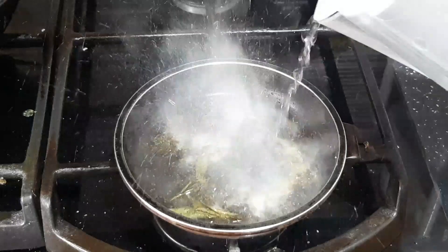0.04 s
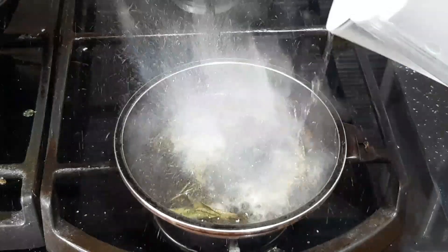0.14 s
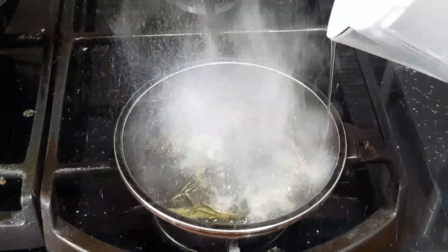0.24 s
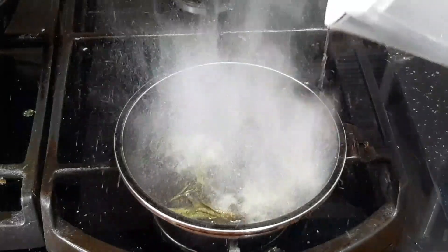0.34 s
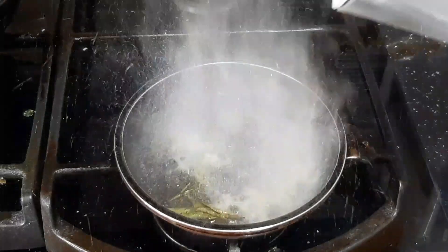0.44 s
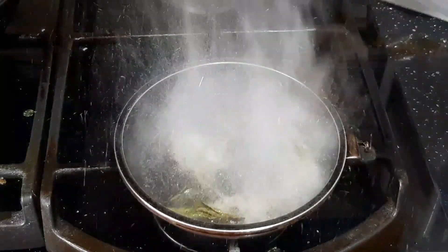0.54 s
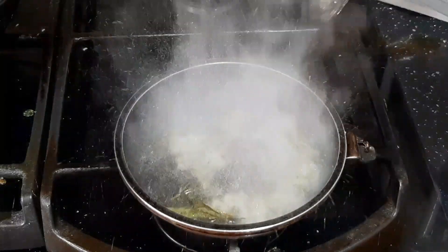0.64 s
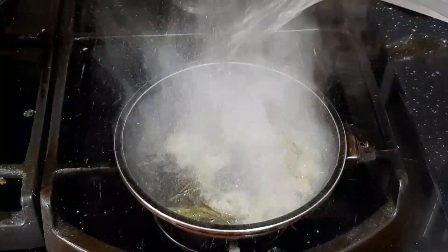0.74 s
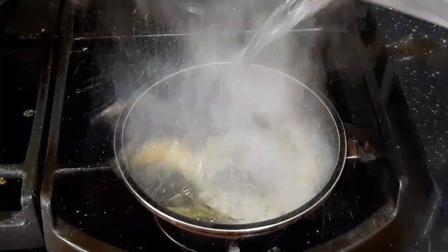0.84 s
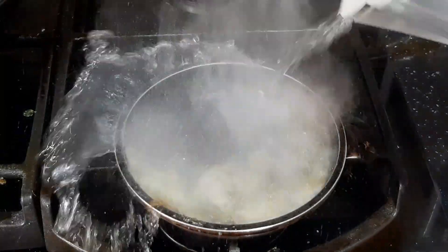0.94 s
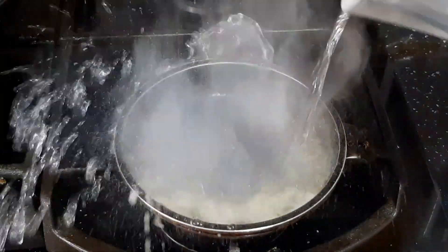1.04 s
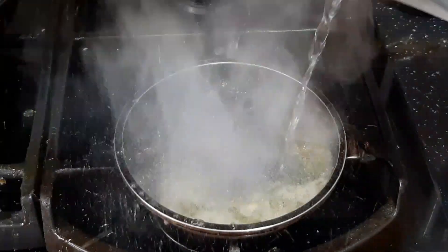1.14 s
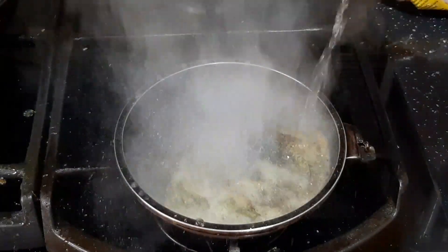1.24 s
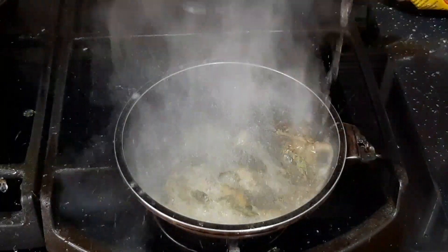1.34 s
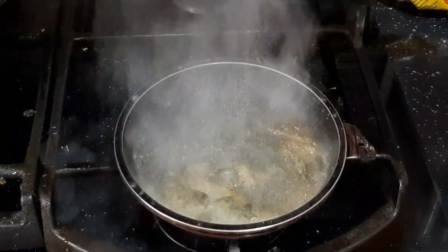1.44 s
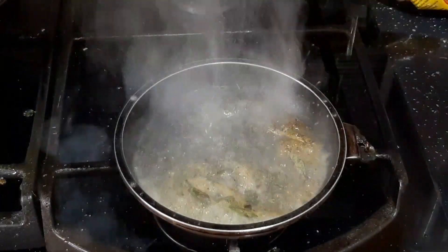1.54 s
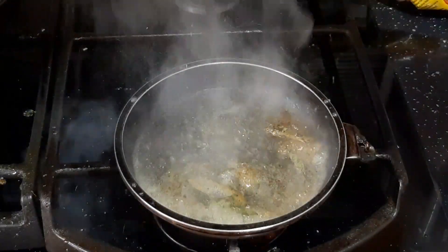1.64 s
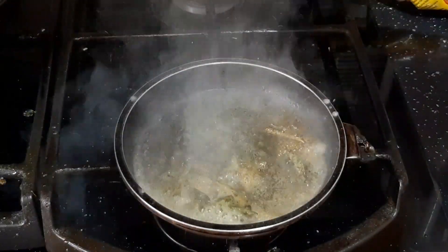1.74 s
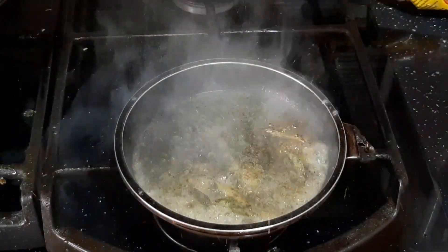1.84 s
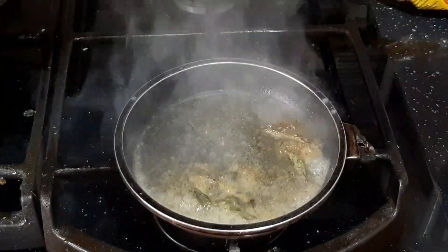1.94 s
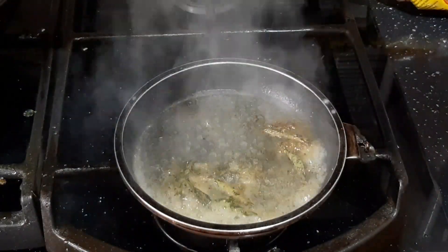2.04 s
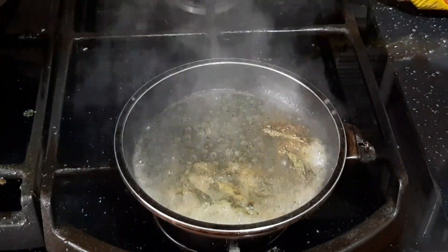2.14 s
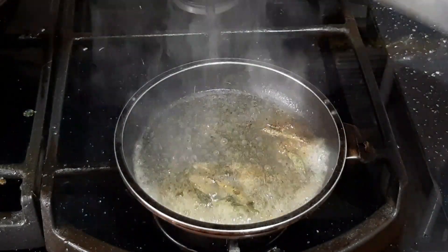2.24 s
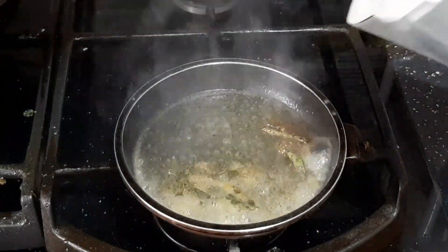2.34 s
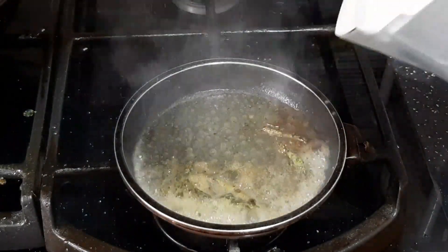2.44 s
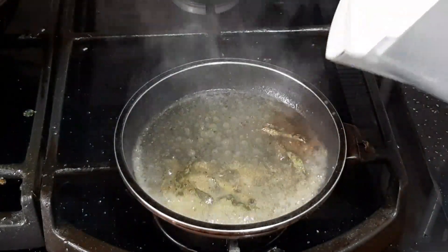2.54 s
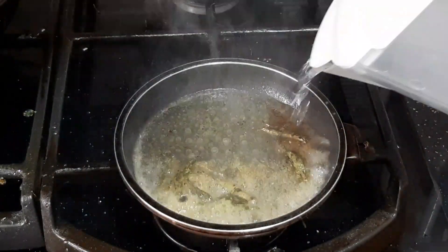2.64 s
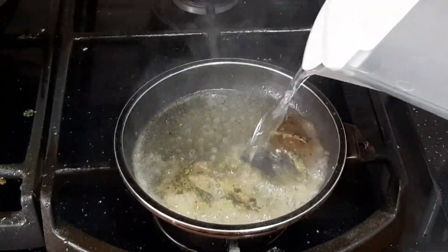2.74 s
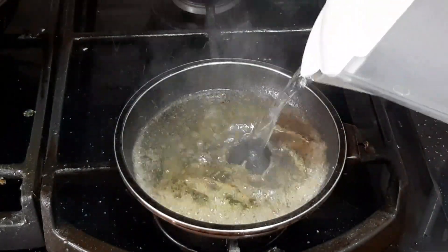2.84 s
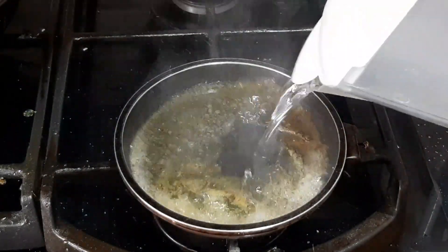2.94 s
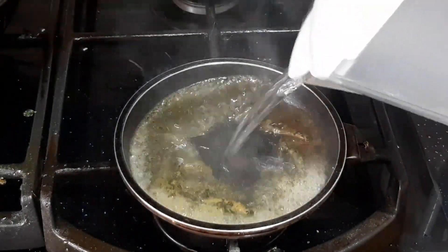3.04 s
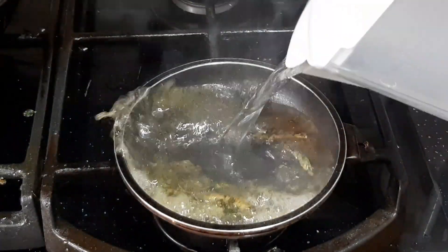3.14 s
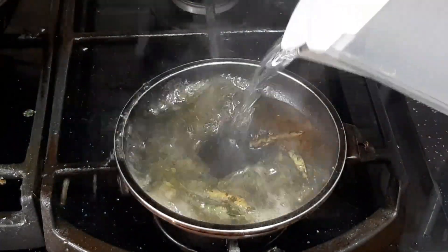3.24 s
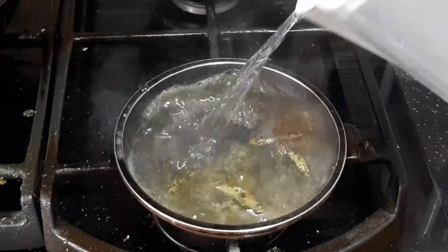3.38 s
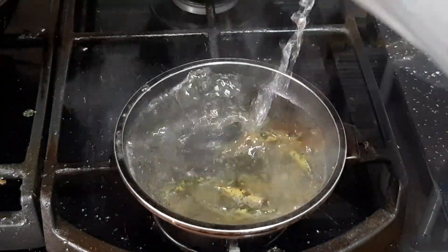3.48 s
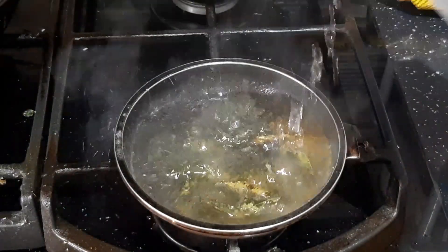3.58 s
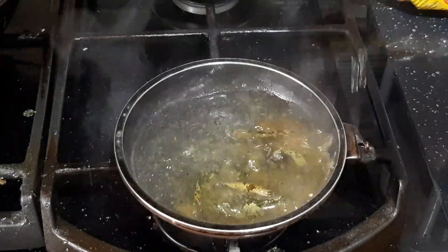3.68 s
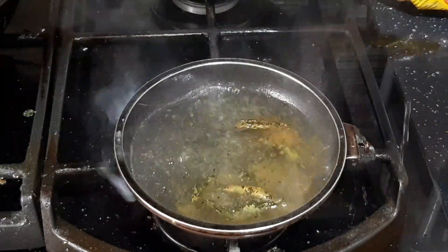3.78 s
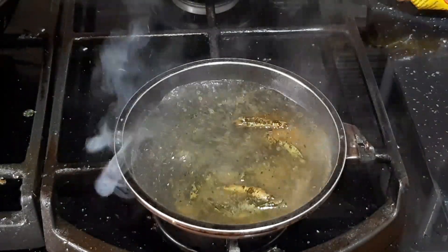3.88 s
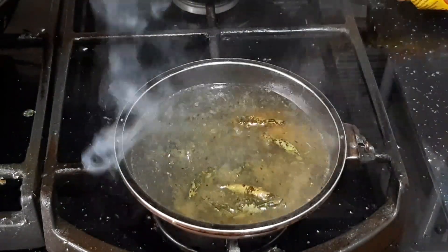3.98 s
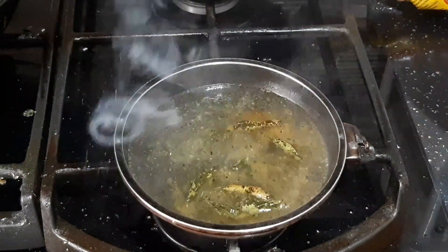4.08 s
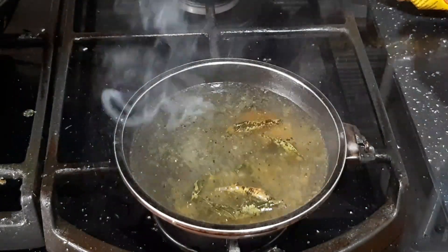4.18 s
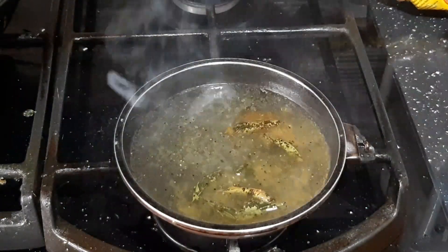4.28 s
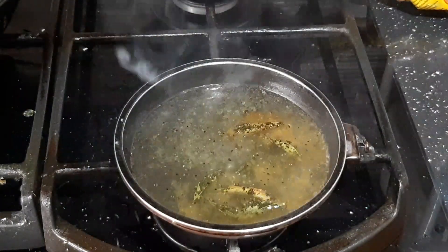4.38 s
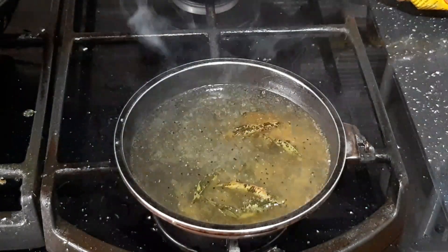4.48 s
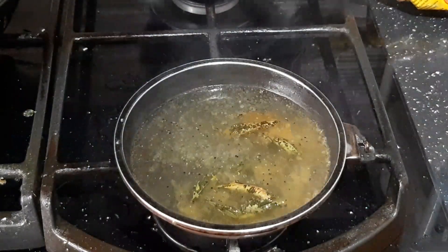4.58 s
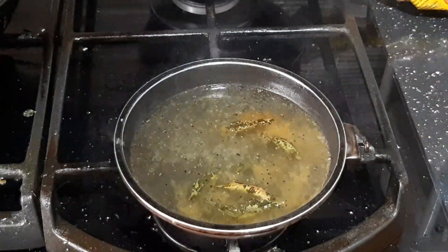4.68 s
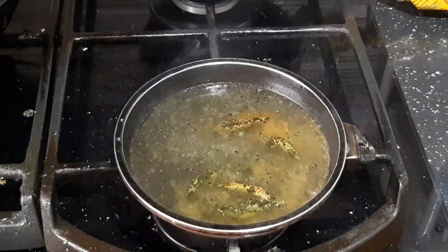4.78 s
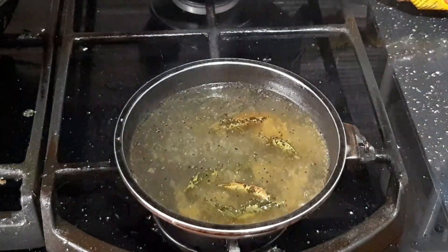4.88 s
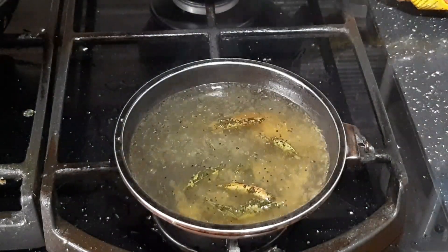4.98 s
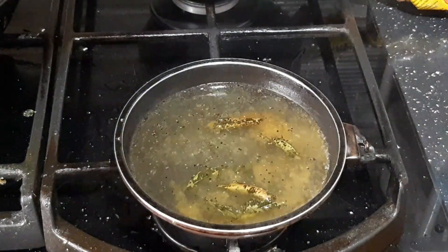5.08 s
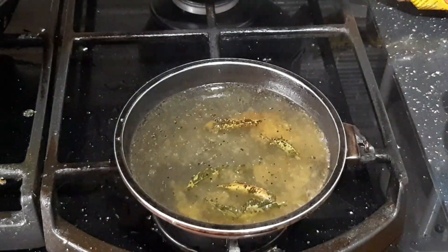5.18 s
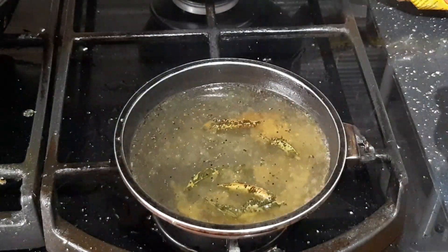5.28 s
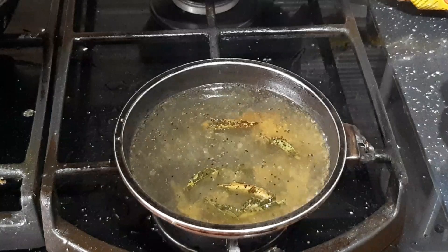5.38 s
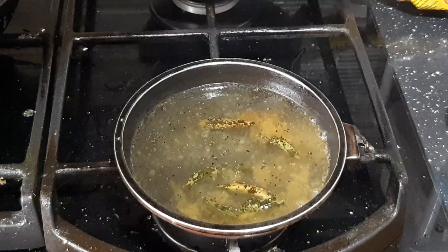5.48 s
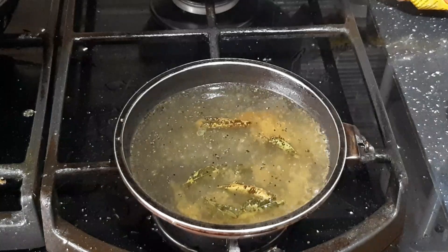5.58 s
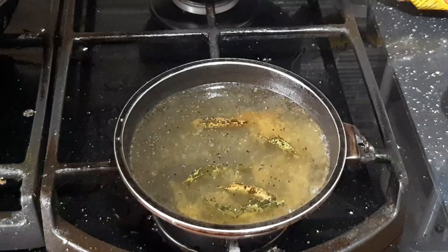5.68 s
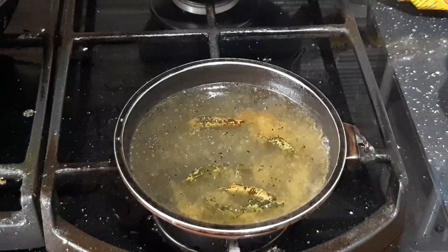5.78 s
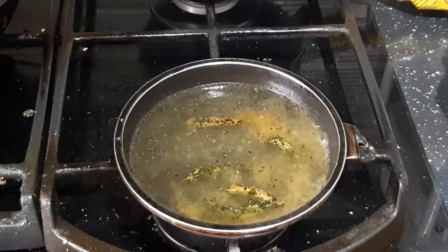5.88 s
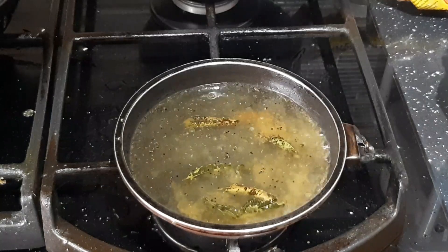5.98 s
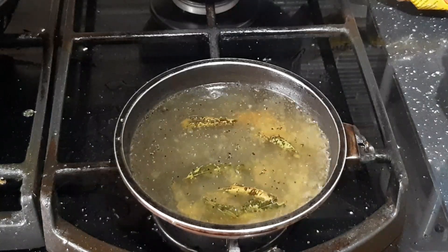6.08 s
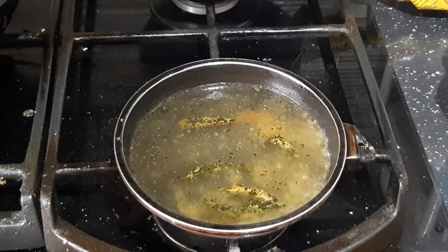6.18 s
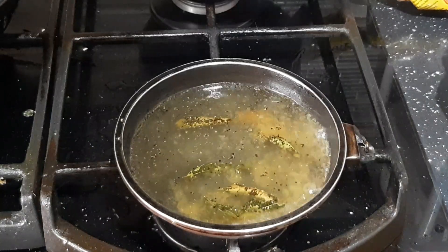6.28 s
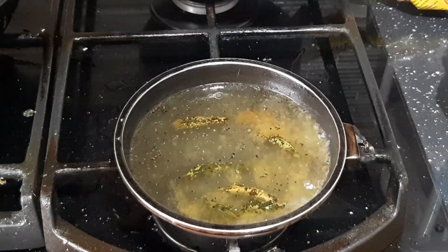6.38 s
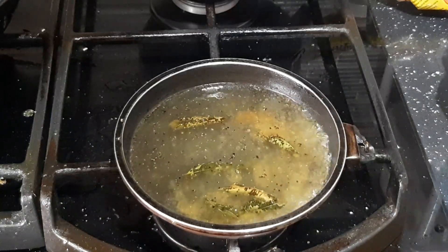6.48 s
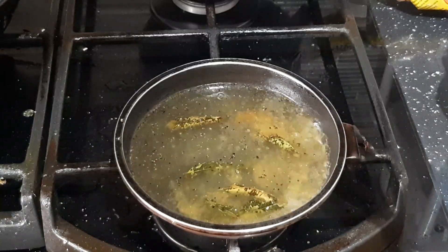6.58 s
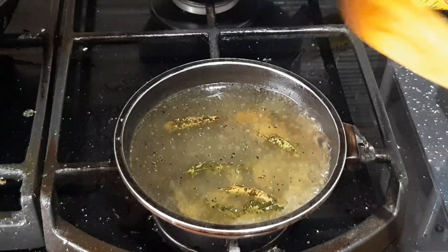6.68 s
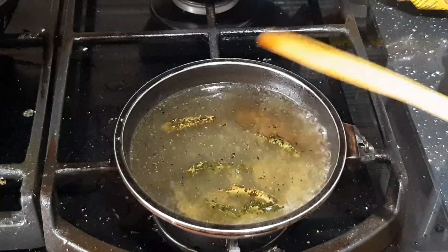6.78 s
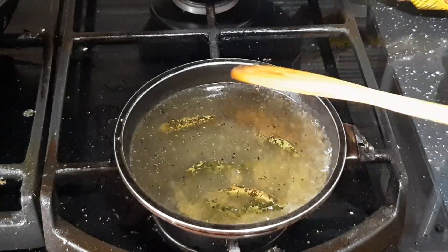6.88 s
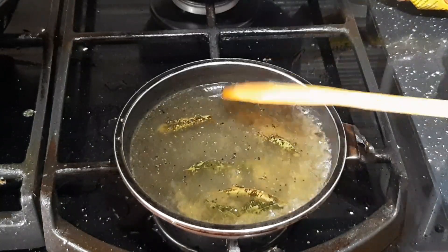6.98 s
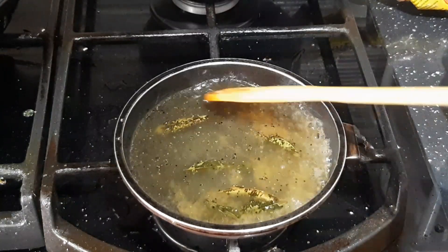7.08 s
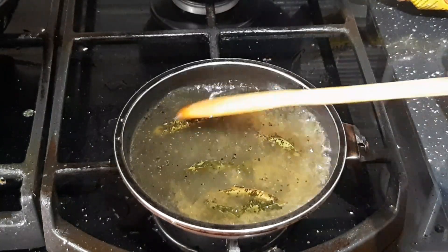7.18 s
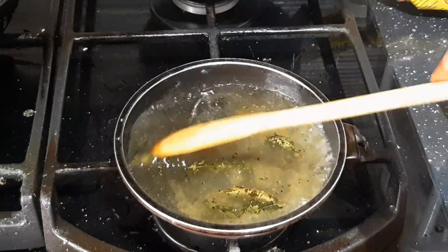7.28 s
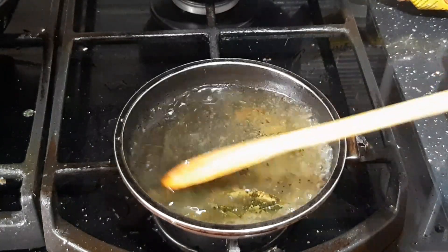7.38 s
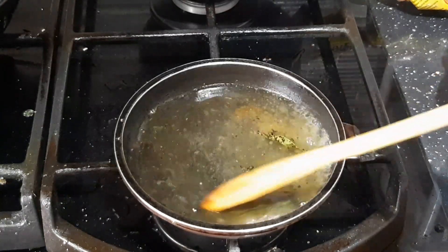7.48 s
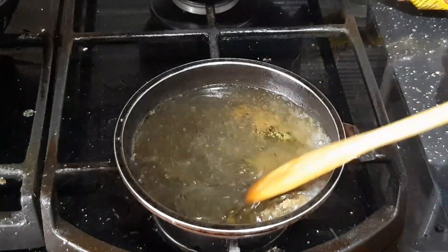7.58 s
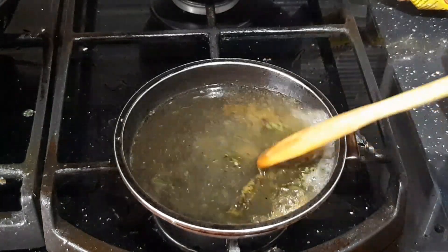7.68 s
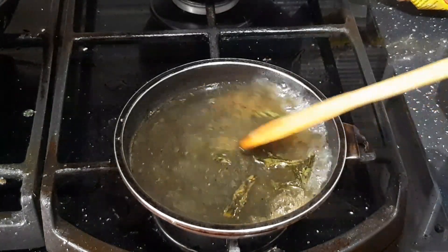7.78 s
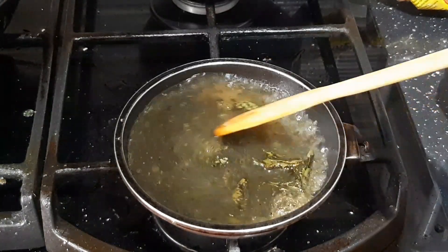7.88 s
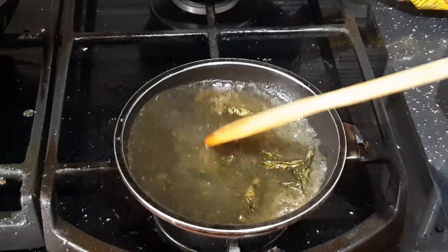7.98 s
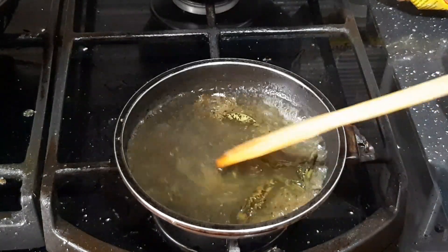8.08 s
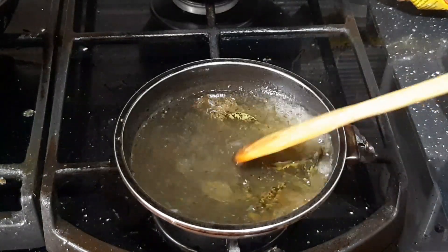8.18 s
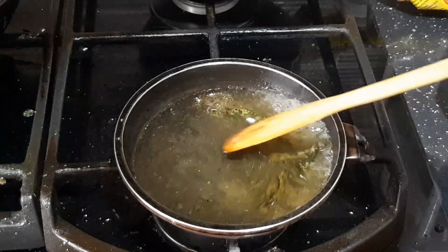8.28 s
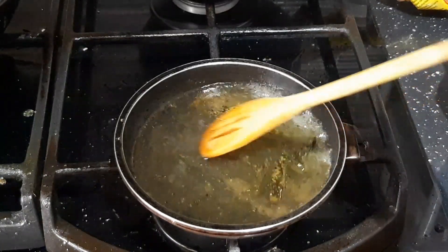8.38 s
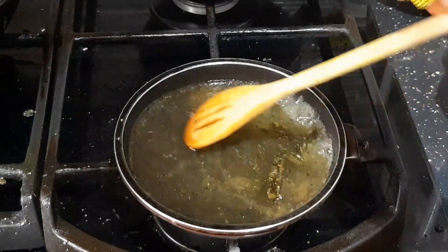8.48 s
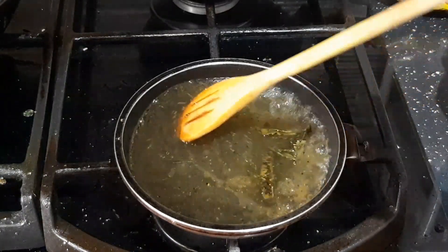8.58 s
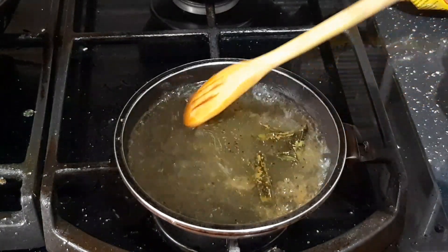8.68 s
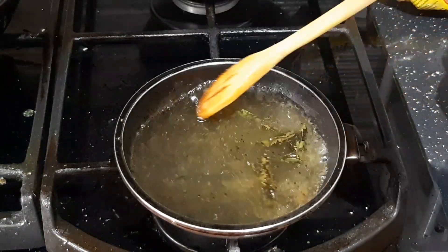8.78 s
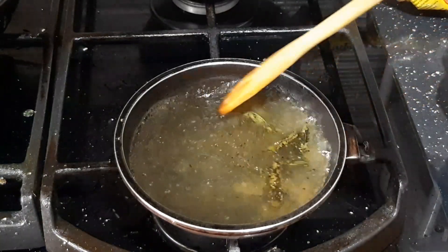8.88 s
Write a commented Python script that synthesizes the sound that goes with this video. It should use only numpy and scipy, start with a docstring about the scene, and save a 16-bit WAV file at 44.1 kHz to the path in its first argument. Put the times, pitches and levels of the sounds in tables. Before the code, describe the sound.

From the start, water flashes to steam in hot oil: a loud, bright, roaring hiss with dense crackle, and fine spray pattering on the left of a very close microphone, the right being softer and duller. The roar surges again around 0.9-1.0 s, then thins from 1.5 s into frying with sparse sharp ticks and blunt thumps of larger drops, heaviest at 1.4-1.6 s. Stronger pops crack at 2.5 and 2.9 s. Around 3.4 s the spray stops abruptly as more water goes in, leaving much quieter frying. From 4.3 s bubbling and spitting pick up, with many pops and a watery murmur, swelling near 4.8 s. A jug knocks and grates on the counter at 5.4-5.7 s, with a loud pop at 5.7 s. It calms around 6 s. From 7 s a wooden spoon plunges in, rasping and sloshing, pressing harder at 8.1 s amid pops and livelier sizzling. A faint burner and room rush lies beneath.

```python
"""Water meets hot oil and spices in a small pan on a gas hob: steam roars and fries, and a cloud of spray
peppers the left microphone port with hiss and clicks. At 3.4 s the spray stops as a second pour drowns
the oil; bursting bubbles and steam pockets keep the pan frying and spitting over murmuring water.
From 5.4 s the jug knocks and grates on the counter, ringing its modes. From 7 s a wooden spoon stirs:
clumped slips rasp in the pan's resonances and water sloshes round it. Burner and room rush throughout."""
import sys
import numpy as np
from scipy import signal
from scipy.fft import rfft, irfft
from scipy.io import wavfile

SR = 44100
rng = np.random.default_rng(int(sys.argv[2]) if len(sys.argv) > 2 else 0)


def persist_wave(psi):
    """Save psi, clipped to +-1, as 16-bit WAV."""
    counts = np.round(np.clip(psi, -1, 1) * 32767).astype(np.int16)
    wavfile.write(sys.argv[1], SR, np.atleast_2d(counts).T)


N = 393813
TIME = np.arange(N) / SR

# Rush of burner and room. Each row: frequency in Hz, relative density in dB per Hz.
ROOM_COLOUR = [(25, -31), (60, -5), (130, 4.5), (350, 4), (700, -0.5), (2000, -4), (8000, -14.5)]
# Water murmuring as it heats. Each row: time in seconds, relative level in dB.
MURMUR_LEVEL = [(3.0, -80.5), (3.6, -61), (4.3, -71.5), (4.8, -49.5), (5.3, -52), (6.3, -59), (7.0, -64.5),
                (7.6, -64)]
# Resonances of the still water in the pan. Each row: frequency in Hz, width in Hz, relative height in dB.
STILL_PAN_RESONANCES = [(950, 110, 0), (1220, 220, -2)]
# Jug touching the counter. Each row: start in seconds, relative peak in dB, loss per rebound in dB.
JUG_KNOCKS = [(5.369, -10, 10.5), (5.462, -13.5, 15), (5.512, -18.5, 11), (5.534, -17.5, 9.5),
              (5.684, -24.5, 1)]
# Modes of the counter. Each row: frequency in Hz, relative level in dB, 60 dB decay time in seconds.
COUNTER_MODES = [(149, -15.5, 0.38), (243.4, -6, 0.15), (275, -2.5, 0.049), (334, -1.5, 0.065),
                 (370, -3.5, 0.1), (461, -19.5, 0.29), (636, -24, 0.11), (835, -12, 0.02)]
# Base of the jug grating on the counter. Each row: frequency in Hz, relative density in dB per Hz.
GRATE_COLOUR = [(200, -15), (500, 4), (1200, 3.5), (1800, -0.5), (3200, -1), (5000, -18), (9000, -47)]
# Resonances of the stirred pan. Each row: frequency in Hz, width in Hz, relative height in dB.
STIRRED_PAN_RESONANCES = [(446, 16, 9.5), (705, 33, 2), (1350, 52, 4), (1900, 27, -2), (2090, 410, 8),
                          (2610, 700, 7.5), (4080, 570, 2.5)]
# Water sloshing round the spoon. Each row: frequency in Hz, relative density in dB per Hz.
SLOSH_COLOUR = [(30, -34), (70, -11), (160, -7.5), (260, 1), (450, -3.5), (700, -16), (1500, -28)]
# First water flashing to steam. Each row: time in seconds, relative level in dB.
FLASH_LEVEL = [(0, -34), (.2, -33), (.4, -41), (.55, -37), (.75, -44), (.88, -31.5), (1.0, -31), (1.2, -44),
               (1.6, -37), (2.4, -60.5)]
# Resonances of the nearly empty pan. Each row: frequency in Hz, width in Hz, relative height in dB.
EMPTY_PAN_RESONANCES = [(1282, 70, 2.5), (1460, 430, -3.5), (2535, 130, 4.5), (3320, 490, -1),
                        (4530, 810, -2.5), (5500, 380, -13)]
# Vigour of the frying. Each row: time in seconds, relative level in dB.
FRYING_LEVEL = [(0.0, -37), (0.72, -39.5), (0.92, -39.5), (1.45, -40.5), (1.8, -45), (2.7, -49.0),
                (3.45, -44.5), (3.7, -48.5), (4.3, -46), (4.6, -41), (5.2, -45), (5.8, -48), (5.97, -53.5),
                (6.92, -51.5), (7.05, -48.5), (7.3, -51), (7.9, -42), (8.4, -51), (8.93, -46)]
# Coarse bubbles, then fine fizz. Each row: frequency in Hz, relative density in dB per Hz.
BUBBLE_COLOUR = [(60, -22), (280, -9.5), (430, -4.5), (600, -7.5), (1050, -7), (1300, -5.5), (1700, -3.5),
                 (2900, -1.5), (5200, -3), (6200, -10), (8500, -14), (15000, -41)]
FIZZ_COLOUR = [(200, -67), (3000, -17), (6000, -11.5), (8500, -15.5), (10000, -12), (12000, -3.5),
               (15500, -6.5)]
# Loudest steam pockets bursting in the oil and spitting on the hot wall.
# Each row: start in seconds, relative level in dB, boost of the treble band in dB.
LOUD_POPS = [(1.4336, -21, 9), (1.773, -26, -10), (2.5353, -15.5, 4.5), (2.871, -18, 30),
             (3.4664, -33.5, -14), (3.8762, -32.5, -1.5), (4.348, -28, 7), (4.424, -31, 6),
             (4.5009, -25, 21), (4.5975, -32, 11.5), (4.721, -26, 15), (4.7734, -24, -9), (4.957, -31, 0),
             (4.9866, -29, 17), (5.165, -19.5, 7), (5.2518, -31, 16), (5.271, -26, 13), (5.297, -38, 13),
             (5.358, -24.5, 6.5), (5.6305, -30, 24), (5.689, -28, 10), (5.7298, -15, 4.5),
             (5.8465, -29.5, 18), (5.8588, -31, 22), (5.9075, -32.5, 23), (6.1885, -36, 14),
             (6.225, -34, 5.5), (6.384, -33, 2.5), (6.631, -34.5, 4), (7.017, -33.5, 13),
             (7.5634, -22.5, 5), (7.721, -32, -0.5), (7.927, -31.5, 3), (7.9586, -30.5, -11),
             (8.0451, -23.5, 1), (8.0529, -28.5, -9), (8.154, -24, -4.5), (8.171, -29, -9),
             (8.2545, -24.5, 2), (8.527, -31, 7)]
# Cracks of the pops. Each row: frequency in Hz, relative density in dB per Hz.
POP_COLOUR = [(50, -35), (200, -6), (500, -4), (1500, 1), (3000, 9.5), (5000, 2.5), (8500, -9.5),
              (12000, 2.5), (15500, 5)]
# Fine spray hissing on the left port. Each row: time in seconds, relative level in dB.
MIST_LEVEL = [(0.0, -20.0), (0.7, -23.4), (0.92, -22), (1.45, -25), (1.7, -28.5), (2.4, -32), (2.95, -32),
              (3.15, -28), (3.38, -30)]
# Ticks of that spray. Each row: frequency in Hz, relative density in dB per Hz.
MIST_COLOUR = [(50, -31), (150, -13), (400, -13.5), (1200, -9), (2700, -8), (4500, -4.5), (5900, -6),
               (7300, -2.5), (8800, -6), (11500, 0.5), (15500, 1)]
# Largest drops on the left port. Each row: start in seconds, relative push in dB, settling scale in seconds.
LARGE_DROPS = [(0.0692, -7, 0.00034), (0.0982, -7.5, 0.00033), (0.164, -1.5, 0.0004), (0.178, -6, 0.00017),
               (0.3204, -4.5, 0.00078), (0.3382, -5.5, 0.0011), (0.5192, -4.5, 0.00042),
               (0.5908, -6.5, 0.00052), (0.6099, -4.5, 0.0003), (0.6956, -6, 0.00011),
               (0.7985, -3.5, 0.00016), (0.8955, -2.5, 0.0017), (1.2463, -5.5, 0.00016),
               (1.2918, -7.5, 0.00023), (1.4298, 0.5, 0.0038), (1.4851, -4.5, 0.00022),
               (1.5518, 0.5, 0.00082), (1.6722, -3, 0.0003), (1.7254, -1.5, 0.00011),
               (1.7495, -8.5, 0.00021), (1.8788, -7.5, 0.00022), (1.903, -1, 0.000093),
               (2.0178, -8, 0.00025), (2.0251, -11.5, 0.00025), (2.0705, -5, 0.0002),
               (2.1068, -12.5, 0.00034), (2.1655, -11, 0.00024), (2.22, -8.5, 0.00026),
               (2.2423, -14.5, 0.00025), (2.5245, -6.5, 0.00036), (2.871, -7, 0.00028),
               (3.0641, -8, 0.00016), (3.1414, -11, 0.00023), (3.2144, -14.5, 0.00035)]
# Smaller drops landing between them. Each row: time in seconds, rate in drops per second.
SMALL_DROP_RATE = [(0, 99.5), (.8, 110.5), (.95, 6), (1.15, 6), (1.5, 60), (2.4, 0)]
# Microphone body shading its right port. Each row: frequency in Hz, gain in dB.
RIGHT_SHADE = [(100, -5.5), (400, -0.5), (2000, -3), (4300, -3.5), (6300, -10), (8300, -13.5),
               (11000, -9.5), (15500, -5)]

CUTOFF_HZ = 15900
# the second pour drowns the oil: the spray level falls at this rate
DROWNED_S, DROWNING_DB_PER_S = 3.392, 1500
# coarse bubbles match the fizz setting at an even simmer and follow a share of its swing in dB
SIMMER_DB, BUBBLES_FOLLOW = -46.5, 0.69
# small pops: rate at an even simmer, setting above the frying curve
SPITS_PER_S, SPIT_DB = 22, 7
# each loud pop throws up oil and stirs a short surge of frying
SURGE_DB, SURGE_S = -20, 0.043
# a loud pop cracks again as its pocket collapses: this much later and weaker
COLLAPSE_S, COLLAPSE_LOSS_DB = 0.0085, 13.5
REBOUND_S = 0.012
# the spoon dips in, sweeps round the pan and bears down once
STIR_START_S, STIR_DB = 7.0, -52
PRESS_S, PRESS_LENGTH_S, PRESS_DB = 8.1, 0.28, 7.5
# the slosh is strongest as the spoon plunges in
SLOSH_DB, PLUNGE_DB, PLUNGE_S, PLUNGE_LENGTH_S = -60, 19.5, 7.105, 0.061


def from_db(db):
    """Decibels to gain."""
    return 10 ** (np.asarray(db) / 20)


def rms_one(x):
    """Scale to unit power."""
    return x / np.sqrt(np.mean(x ** 2) + 1e-20)


def in_time(rows):
    """Each column of a curve at every sample."""
    s, *columns = np.transpose(rows)
    return [np.interp(TIME, s, c) for c in columns]


def drift(rate):
    """Random wander through points of spread one, this many a second."""
    knots = rng.standard_normal(N // 20)
    return np.interp(TIME * rate, np.arange(len(knots)), knots)


def swell(peak_s, length_s):
    """A smooth rise to one and fall again."""
    return np.exp(-((TIME - peak_s) / length_s) ** 2)


def at_random(per_s):
    """Moments of chance events at a rate that may change."""
    return TIME[rng.random(N) < per_s / SR]


def grains(per_s, spread_db, largest):
    """Random clicks of either sign, many small and a few large; unit power overall, even as the rate moves."""
    sizes = from_db(spread_db * np.minimum(rng.exponential(1, N), largest)) / np.sqrt(per_s)
    signs = rng.choice([-1, 1], N)
    struck = rng.random(N) < per_s / SR
    return rms_one(sizes * signs * struck)


def through(x, response):
    """Pass a sound through an impulse response."""
    return signal.oaconvolve(np.atleast_2d(x), np.atleast_2d(response), axes=-1)[:, :N]


def colour(x, points, size=4096):
    """Causal (minimum-phase) filter with the given spectrum."""
    hz, db = np.transpose(points)
    grid = np.maximum(np.arange(size // 2 + 1) * SR / size, 1)
    gain = from_db(np.interp(np.log(grid), np.log(hz), db))
    # folding the cepstrum puts the energy as early as possible
    cepstrum = irfft(np.log(gain))[:size // 2]
    cepstrum[1:] *= 2
    return through(x, irfft(np.exp(rfft(cepstrum, size))))


def ring(x, hz, t60):
    """A unit click sets a decaying sine of initial height one ringing."""
    r, w = from_db(-60 / (t60 * SR)), 2 * np.pi * hz / SR
    return signal.lfilter([0, np.sin(w)], [1, -2 * r * np.cos(w), r * r], x + 1e-18)


def resonate(x, peaks):
    """Parallel resonances of given centre, width and relative height, in alternate sign; unit power."""
    total = 0
    for k, (hz, width, db) in enumerate(peaks):
        t60 = np.log(1000) / (np.pi * width)
        total = total + (-1) ** k * from_db(db) * width * ring(x, hz, t60)
    return rms_one(total)


def scatter(decay_s, size=24000):
    """A dying spray of reflections, different at each port; unit energy."""
    t = TIME[:size]
    envelope = np.exp(-t / decay_s) * (1 - np.exp(-8 * t / decay_s))
    tail = rng.standard_normal((2, size)) * envelope
    return tail / np.sqrt(np.sum(tail ** 2, axis=1, keepdims=True))


def kitchen(x, near_db, room_db, near_s=0.0057, room_s=0.025, wall_hz=5500):
    """Direct sound, quick reflections from pan and hob, then the duller room."""
    dull = signal.butter(1, wall_hz, fs=SR, output="sos")
    response = from_db(near_db) * scatter(near_s)
    response += from_db(room_db) * signal.sosfilt(dull, scatter(room_s))
    response[[0, 1], [0, 5]] += 1   # direct sound, five samples later on the right
    return through(x, response)


def room_tone(level_db=-58.5, early_db=-10.0, rise_start_s=4.2, rise_s=0.97):
    """Soft rush of burner and room, mostly alike at both ports; it starts lower and comes up once."""
    air = rng.standard_normal(N) + 0.44 * rng.standard_normal((2, N))
    risen = np.clip((TIME - rise_start_s) / rise_s, 0, 1)
    return from_db(level_db + early_db * (1 - risen)) * rms_one(colour(air, ROOM_COLOUR))


def murmur():
    """Small bubbles collapse under the water and ring in the pan."""
    level_db, = in_time(MURMUR_LEVEL)
    collapses = grains(per_s=250, spread_db=2.5, largest=5.8)
    ringing = resonate(collapses, STILL_PAN_RESONANCES) * from_db(level_db)
    return kitchen(ringing, near_db=-43, room_db=-9.0) * from_db([[0], [-4]])


def knocks(grate_s=0.03, grate_db=-24, lowest_hz=102):
    """The jug lands, rocks and grates; each touch rings the counter a little differently."""
    touches = [(s + k * REBOUND_S, db - k * loss_db) for s, db, loss_db in JUG_KNOCKS for k in range(3)]
    s, peak_db = np.transpose(touches)
    blows = np.zeros(N)
    blows[np.round(s * SR).astype(int)] = from_db(peak_db)
    thud = sum(ring(blows * from_db(db + rng.normal(0, 1.5, N)), hz, t60) for hz, db, t60 in COUNTER_MODES)
    low_cut = signal.butter(2, lowest_hz, "high", fs=SR, output="sos")   # keeps the lowest rumble out of the thud
    thud = signal.sosfilt(np.vstack([low_cut, low_cut]), thud)
    thud = thud + from_db(-3) * through(thud, scatter(0.058))
    rubbing = signal.lfilter([1], [1, -np.exp(-1 / (grate_s * SR))], blows + 1e-18)
    grit = rms_one(colour(grains(per_s=2500, spread_db=3.0, largest=4.0), GRATE_COLOUR))
    grate = kitchen(rubbing * grit, near_db=-3.0, room_db=-1.5)
    return from_db(-5.5) * thud + from_db(grate_db) * grate


def spoon(dip_s=0.097):
    """Wood drags over spices on the bottom and rasps in the pan's resonances, pushing the water aside."""
    dipped = np.clip((TIME - STIR_START_S) / dip_s, 0, 1)
    pressure_db = STIR_DB + PRESS_DB * swell(PRESS_S, PRESS_LENGTH_S)
    slips = grains(per_s=800, spread_db=7.0, largest=3.8) * from_db(2.8 * drift(25))
    rasp = resonate(slips, STIRRED_PAN_RESONANCES) * from_db(pressure_db)
    slosh_db = SLOSH_DB + PLUNGE_DB * swell(PLUNGE_S, PLUNGE_LENGTH_S)
    slosh = rms_one(colour(rng.standard_normal(N), SLOSH_COLOUR)) * from_db(slosh_db)
    return kitchen(rasp * dipped, near_db=1.5, room_db=-20.0) + slosh * dipped


def flash():
    """The first water boils away at once and roars in the hollow of the pan."""
    level_db, = in_time(FLASH_LEVEL)
    roar = resonate(grains(per_s=9000, spread_db=3.0, largest=5.0), EMPTY_PAN_RESONANCES)
    # swirling steam changes the speed of sound, so the resonances wander
    sound_speed = 1 + .05 * drift(9)
    roar = np.interp(np.cumsum(sound_speed) / SR, TIME, roar)
    roar = roar * from_db(level_db - 2 + 0.94 * drift(22.3))
    return kitchen(roar, near_db=3.0, room_db=-11.0) * from_db([[0], [-7]])


def vigour():
    """Level setting of the frying in dB, with a dying surge after each loud pop."""
    kicks = np.zeros(N)
    for s, db, _ in LOUD_POPS:
        kicks[round(s * SR)] = from_db(db + SURGE_DB)
    surge = signal.lfilter([1], [1, -np.exp(-1 / (SURGE_S * SR))], kicks + 1e-18)
    return 20 * np.log10(np.hypot(from_db(in_time(FRYING_LEVEL)[0]), surge))


def frying(clump_db=4.5, bubbles_db=-0.5, treble_db=-0.3):
    """Bubbles burst in clumps at three places in the pan; the finest ones fizz in the treble."""
    fizz_db = vigour()
    bubble_db = SIMMER_DB + BUBBLES_FOLLOW * (fizz_db - SIMMER_DB)
    bubbles, fizz = 0, 0
    for place in range(3):
        clumps = from_db(clump_db * drift(60))
        bursts = grains(per_s=1100, spread_db=4.8, largest=5.0)
        foam = grains(per_s=900, spread_db=5.5, largest=5.0)
        coarse = bursts * clumps * from_db(bubble_db)
        fine = (bursts + foam) * clumps * from_db(fizz_db)
        bubbles = bubbles + kitchen(coarse, near_db=0.0, room_db=1.0)
        fizz = fizz + kitchen(fine, near_db=-2.0, room_db=-1.5)
    return from_db(bubbles_db) * colour(bubbles, BUBBLE_COLOUR) + from_db(treble_db) * colour(fizz, FIZZ_COLOUR)


def spits(spread_db=1.5, bright_db=14, bright_spread_db=6, largest=1.3):
    """Small pops, more and louder as the frying grows: rows like those of the loud pops."""
    fry_db, = in_time(FRYING_LEVEL)
    s = at_random(SPITS_PER_S * from_db(fry_db - SIMMER_DB))
    size, tone = np.minimum(rng.standard_normal((len(s), 2)), largest).T
    level_db = np.interp(s, TIME, fry_db) + SPIT_DB + spread_db * size
    return list(zip(s, level_db, bright_db + bright_spread_db * tone))


def pops(burst_s=0.001, split_hz=6500, level_db=3.5, spit_growth=0.55):
    """Each steam pocket cracks open at its own place in the pan; louder ones spit more after the crack."""
    out, t = np.zeros((2, N + SR)), TIME[:600]
    low_pass, high_pass = (signal.butter(2, split_hz, kind, fs=SR, output="sos") for kind in ("low", "high"))
    collapses = [(s + COLLAPSE_S, db - COLLAPSE_LOSS_DB, bright_db) for s, db, bright_db in LOUD_POPS]
    for s, db, bright_db in list(LOUD_POPS) + collapses + spits():
        spit = from_db(spit_growth * db - 2) * rng.standard_normal(len(t)) * np.exp(-t / burst_s)
        spit[0] -= 1   # the crack itself
        crack = signal.sosfilt(low_pass, spit) - signal.sosfilt(high_pass, spit) * from_db(bright_db)
        # level set by the energy, spread over 2 ms
        crack *= from_db(db + level_db) / np.sqrt(np.sum(crack ** 2) / (.002 * SR))
        heard = kitchen(crack, near_db=-5.5, room_db=-5.0)
        at = round(s * SR)
        out[:, at:at + heard.shape[1]] += heard
    return colour(out[:, :N], POP_COLOUR)


def mist(thick_db=-22, gain_db=3.0):
    """Tiny droplets tick on the left port: a smooth hiss in thick cloud, single ticks as it thins."""
    level_db = in_time(MIST_LEVEL)[0] - DROWNING_DB_PER_S * np.clip(TIME - DROWNED_S, 0, .03)
    thickness = from_db(level_db - thick_db) ** 2
    ticks = grains(per_s=30000 * thickness + 2500, spread_db=3.0, largest=5.8)
    strays = grains(per_s=1000 * thickness + 90, spread_db=4.0, largest=3.2) / (1 + thickness)
    hiss = rms_one(colour(ticks + from_db(-3) * strays, MIST_COLOUR))
    return hiss * from_db(level_db + gain_db + 1.48 * drift(40.52))


def droplets(push_s=0.00022, recoil=0.41, stretch=5.1, port_hz=80, soft_hz=5200,
             level_db=1.5, small_db=-16.0, spread_db=2.5):
    """A landing drop pushes on the port and recoils; slow-settling ones recoil harder."""
    moments = at_random(in_time(SMALL_DROP_RATE)[0])
    small = [(s, small_db + spread_db * rng.normal(), rng.uniform(.00015, .0005)) for s in moments]
    out, t = np.zeros(N), TIME[:2000]
    for s, peak_db, settle_s in list(LARGE_DROPS) + small:
        push = np.sin(np.pi * t / push_s) ** 2 * (t <= push_s)
        strength = min(recoil * np.sqrt(settle_s / 0.0012), 1)
        pull = strength * np.exp(-t / (stretch * settle_s)) * (t > push_s)
        at = round(s * SR)
        out[at:at + len(t)] += from_db(peak_db + level_db) * (push - pull)
    leak = signal.butter(2, port_hz, "high", fs=SR, output="sos")
    soften = signal.butter(2, soft_hz, fs=SR, output="sos")
    return signal.sosfilt(np.vstack([leak, leak, soften]), out)


def scene():
    """The pan, spoon and jug reach both ports; the spray touches only the left."""
    left, right = flash() + frying() + murmur() + pops() + spoon() + knocks()
    spray = mist()[0] + droplets()
    return np.vstack([left + spray, colour(right, RIGHT_SHADE)]) + room_tone()


def record(dry):
    """The highest peaks are rounded and the top is cut steeply."""
    rounded = dry / (1 + (dry / .97) ** 6) ** (1 / 6)
    return signal.sosfilt(signal.ellip(12, .1, 80, CUTOFF_HZ, fs=SR, output="sos"), rounded)


dry = scene()
out = record(dry)
persist_wave(out)
```